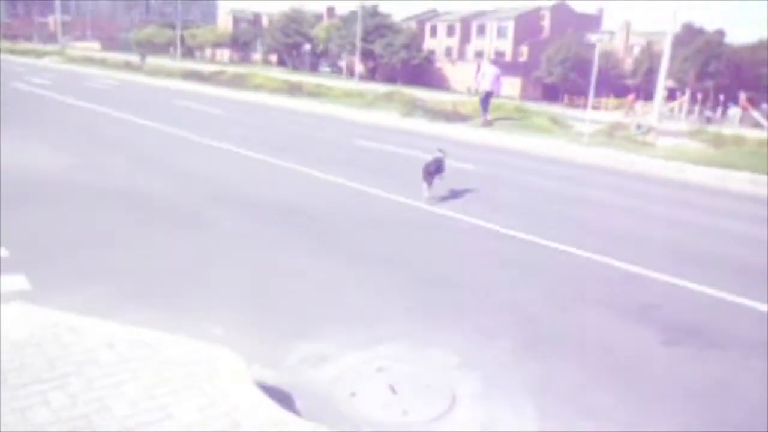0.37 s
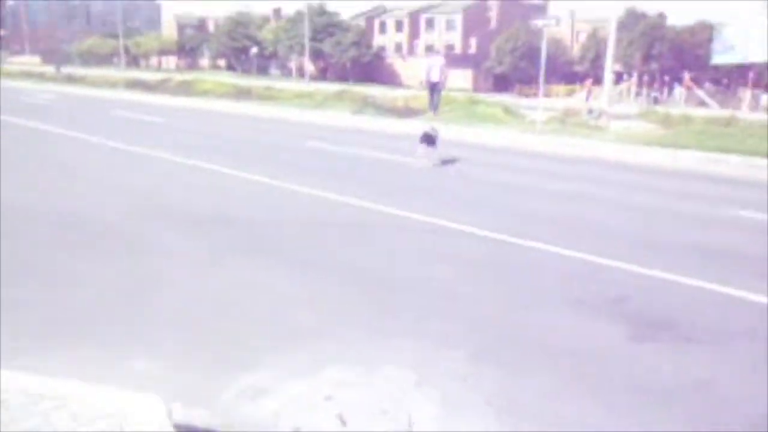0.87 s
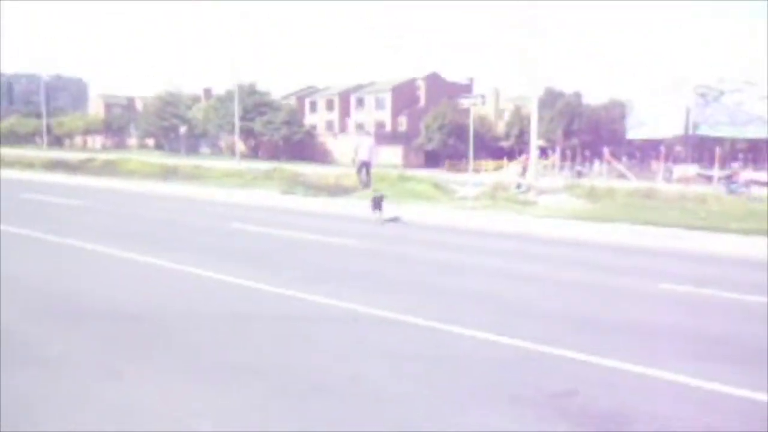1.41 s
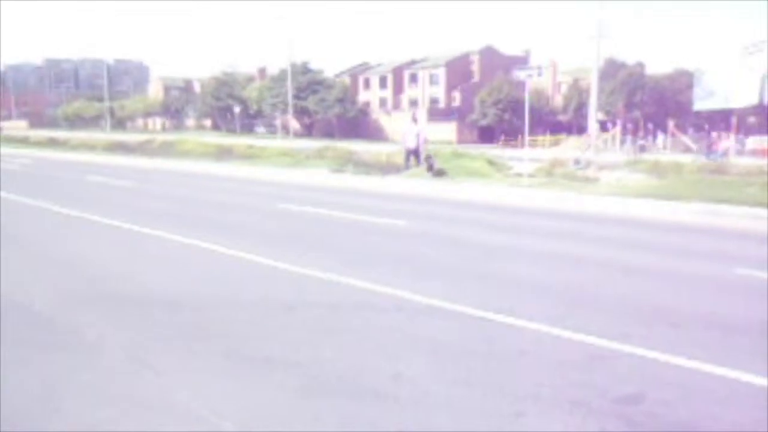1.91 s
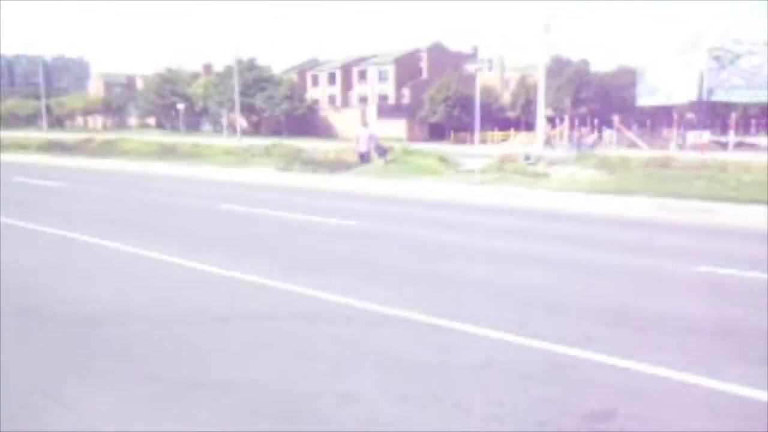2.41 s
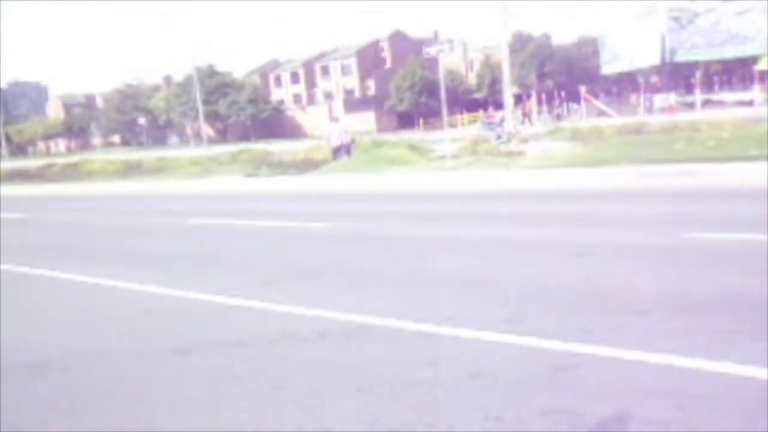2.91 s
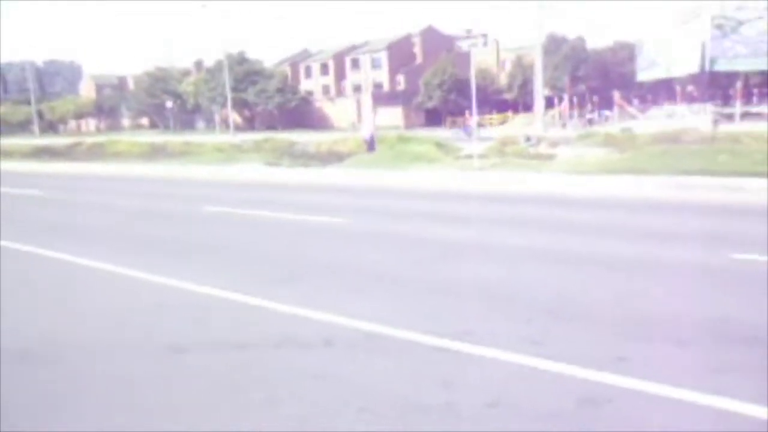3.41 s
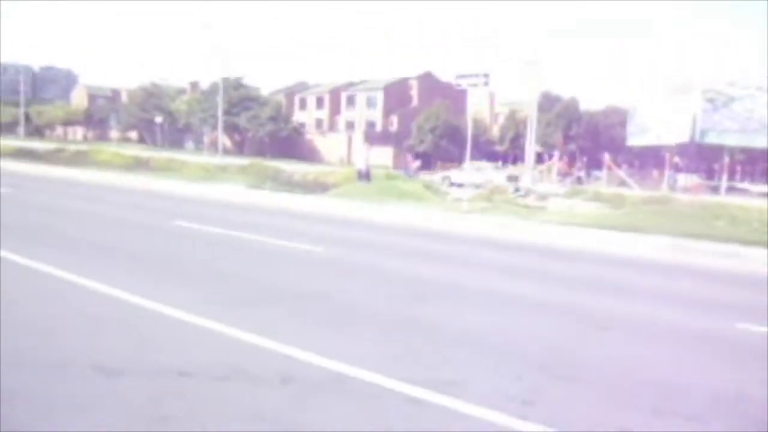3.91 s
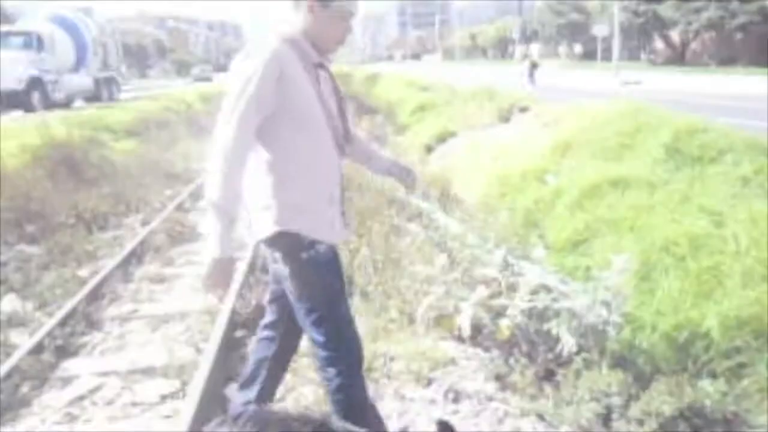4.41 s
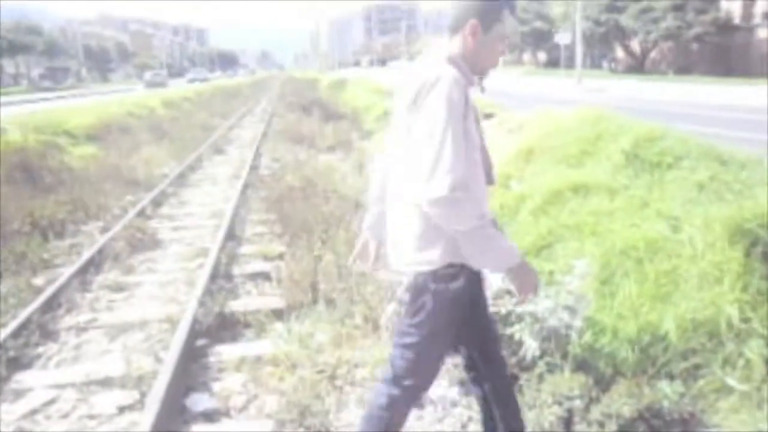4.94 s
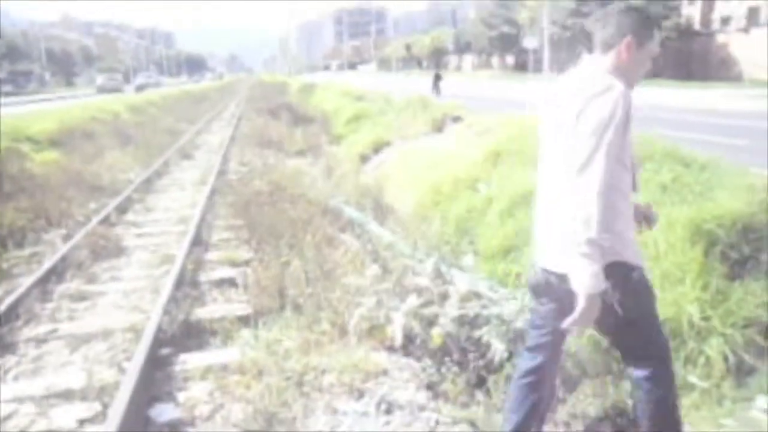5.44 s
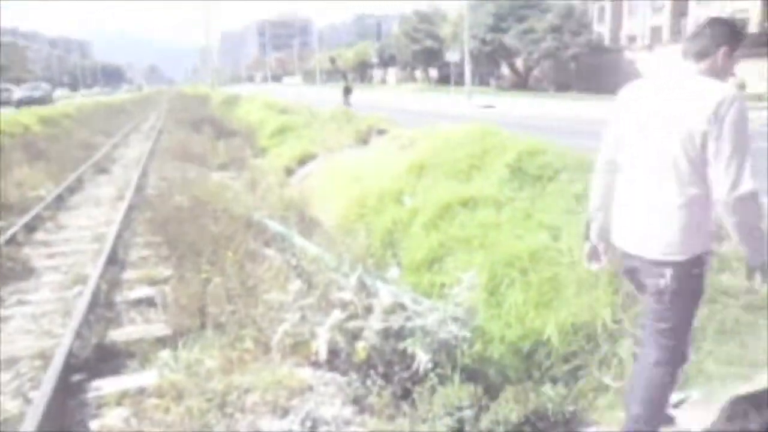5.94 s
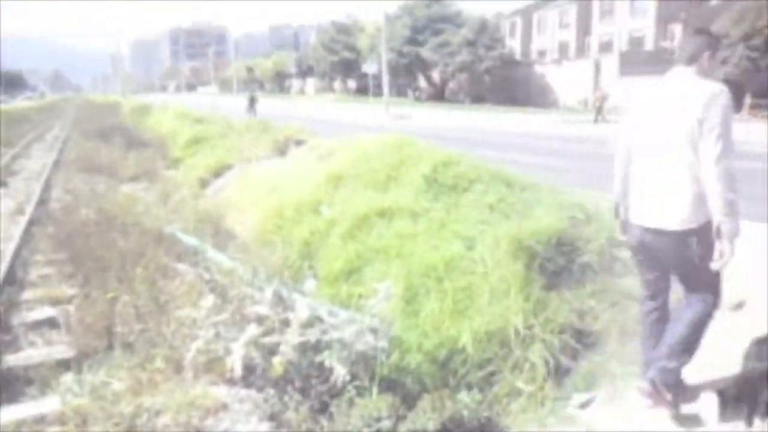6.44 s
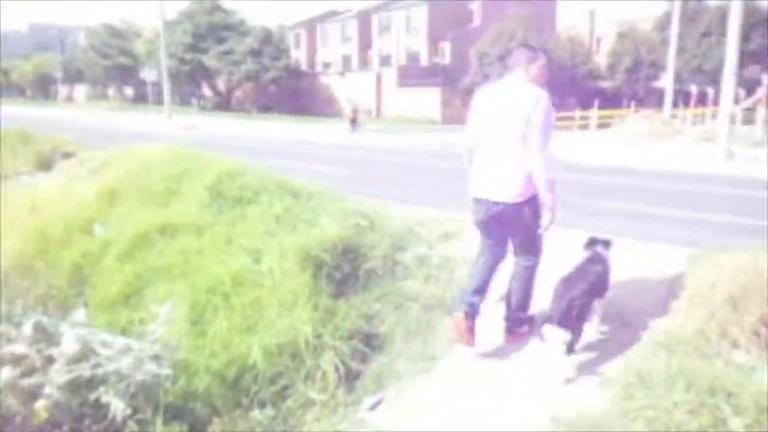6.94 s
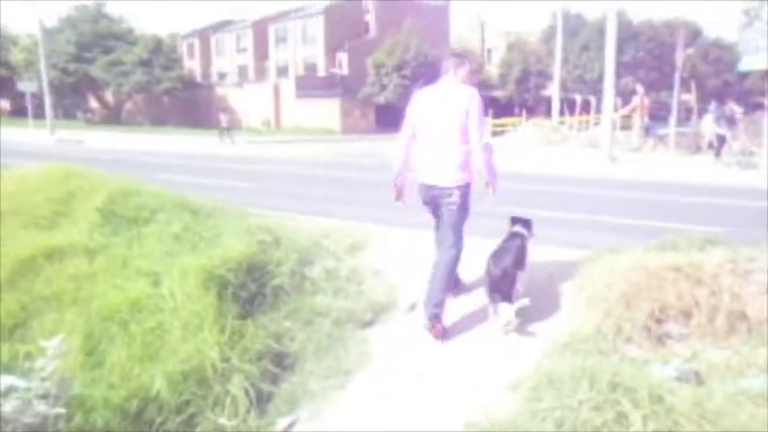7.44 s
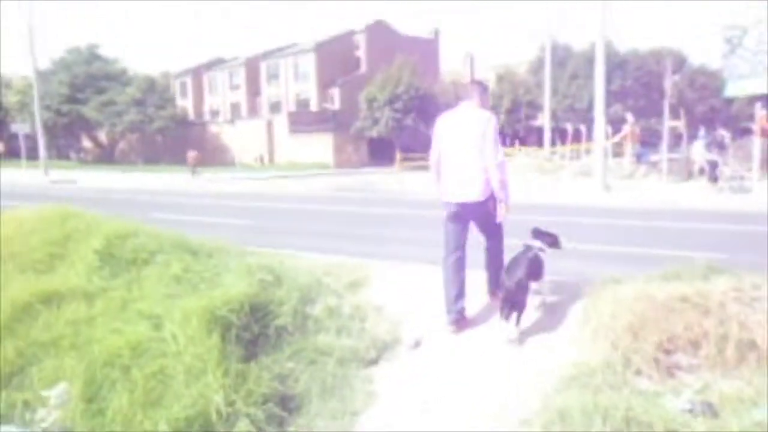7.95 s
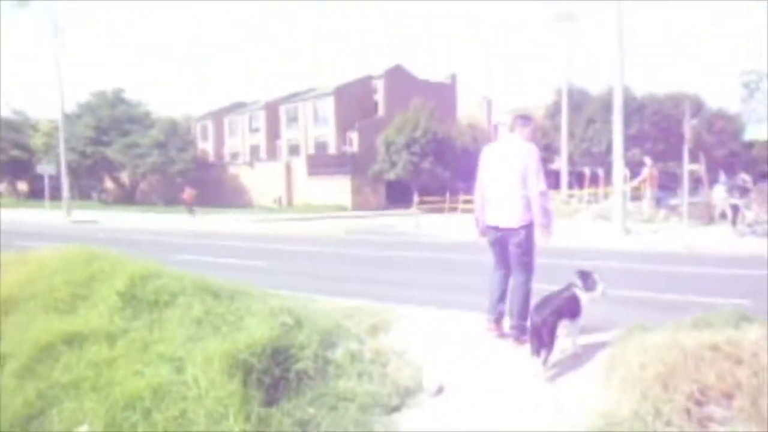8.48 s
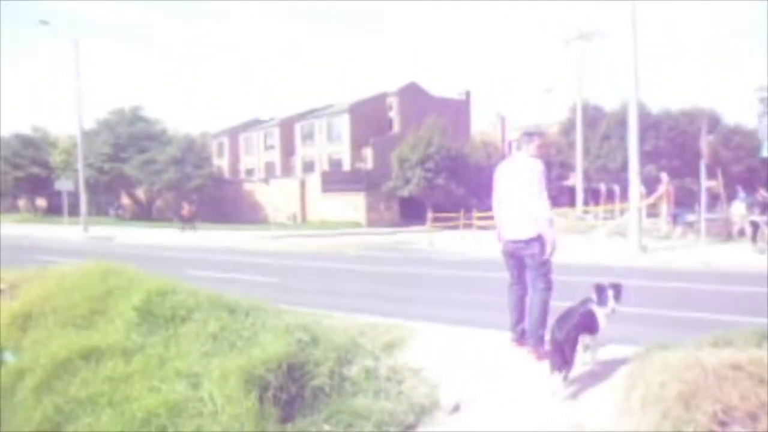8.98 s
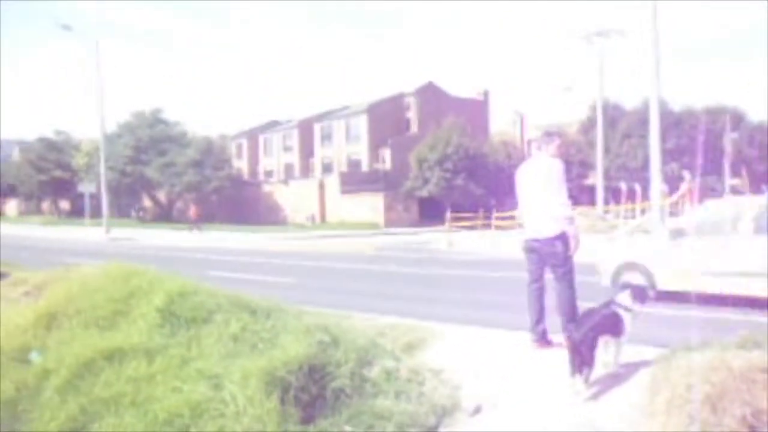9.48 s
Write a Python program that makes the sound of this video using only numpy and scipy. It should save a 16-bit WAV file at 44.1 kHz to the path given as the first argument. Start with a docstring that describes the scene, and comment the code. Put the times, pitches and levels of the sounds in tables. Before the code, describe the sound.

Distant avenue traffic hums under a bird's gliding whistles and soft ticks, then wind buffets the microphone as a lorry roars and bangs past and a car closes in.

```python
"""Beside a wide road, heard by a small camera from two spots with a short silent break between them.
First: far traffic as banded noise, droning engines as wavering harmonics, a bird's two gliding whistles
and trill, finger ticks ringing in the housing. Then, louder: puffs and gusts of wind on the microphone,
a lorry roaring and banging past as noise with hollow resonances and jolts, and a car closing in,
its tyre noise combed by an echo off hard ground."""
import sys
import numpy as np
from scipy import signal
from scipy.fft import rfft, irfft, next_fast_len
from scipy.io import wavfile
from scipy.ndimage import uniform_filter1d, map_coordinates

SR = 44100
rng = np.random.default_rng(int(sys.argv[2]) if len(sys.argv) > 2 else 0)


def level_to_linear(level):
    """Convert decibel levels to linear amplitude factors, elementwise."""
    exponent = np.asarray(level, float) / 20
    return 10 ** exponent


def pcm_store(signal):
    """Save signal as 16-bit PCM."""
    levels = np.round(np.clip(np.atleast_2d(signal), -1, 1) * 32767)
    wavfile.write(sys.argv[1], SR, levels.astype(np.int16).T)


N = 423360

# road ranges drone, roar, tyre, rasp, hiss: (low edge [Hz], high edge [Hz])
ROAD_HZ = [(65, 200), (200, 800), (800, 2400), (2400, 4400), (4400, 9000)]
# position of each road range against the tyre range: (steps)
RANGE_STEPS = np.c_[[-2, -1, 0, 1, 2]]
# a single partial: (multiple, level [dB])
SINGLE = [(1, 0)]


def unit(x):
    """Scaled to rms 1."""
    return x / np.sqrt(np.mean(x ** 2) + 1e-20)


def along(points, hz):
    """(Hz, value) points read on a log frequency axis."""
    f, v = np.transpose(points)
    return np.interp(np.log(hz + 1), np.log(f + 1), v)


def curves(rows):
    """One value per sample for each column after the time."""
    s, *cols = np.transpose(rows)
    return [np.interp(np.arange(N) / SR, s, c) for c in cols]


def wobble(knots_per_s, count=N):
    """Smooth random curve through normal knots."""
    coarse = np.arange(0, count + 100, 100)
    knots = rng.standard_normal(int(count * knots_per_s / SR) + 4)
    smooth = map_coordinates(knots, [coarse * knots_per_s / SR])
    return np.interp(np.arange(count), coarse, smooth)


def filtered(x, response):
    """x shaped by a zero-phase response of frequency."""
    m = next_fast_len(N + 8192)
    return irfft(rfft(x, m) * response(np.fft.rfftfreq(m, 1 / SR)), m)[..., :N]


def add(out, s, sound):
    """Lays a short sound in at s seconds."""
    part = out[round(s * SR):][:len(sound)]
    part += sound[:len(part)]


def patchy(patchy_db):
    """White noise with patches of random gain in time and frequency."""
    z = signal.stft(rng.standard_normal(N), nperseg=512)[2]
    field = uniform_filter1d(rng.standard_normal(z.shape), size=5, axis=0)
    field = uniform_filter1d(field, size=10, axis=1)
    return signal.istft(z * level_to_linear(patchy_db * unit(field)), nperseg=512)[1][:N]


def layers(colour, ranges, patchy_db):
    """Coloured noise split into its overlapping ranges, each of rms 1."""
    def above(hz, at):
        return 1 / (1 + (at / (hz + 1)) ** 8)

    def bank(hz):
        bands = [np.sqrt(above(hz, lo) * (1 - above(hz, hi))) for lo, hi in ranges]
        return colour(hz) * np.array(bands)

    return np.array([unit(v) for v in filtered(patchy(patchy_db), bank)])


def driven(mix_db, level_db, grows=1, pivot_db=0, bright_db=0):
    """Gains of all ranges from one level and brightness; grows is dB per dB about the pivot."""
    return level_to_linear(np.c_[mix_db] + pivot_db + np.c_[grows] * (level_db - pivot_db) + bright_db)


def flutter(db):
    """Random level swing of each road range, in dB."""
    return db * np.array([wobble(rate) for rate in (8.3, 7, 5, 5.6, 5)])


def tone(rows, orders, waver_db, slip_rad, rate):
    """Multiples of a gliding pitch, each wavering in level and phase; silent outside its rows."""
    s, hz, db = np.transpose(rows)
    t = np.arange(max(s[0], 0), s[-1], 1 / SR)
    turn = 2 * np.pi * np.cumsum(np.interp(t, s, hz)) / SR
    stack = np.zeros(len(t))
    for k, level_db in orders:
        gain = level_to_linear(level_db + waver_db * wobble(rate, count=len(t)))
        stack += gain * np.sin(k * turn + slip_rad * wobble(rate, count=len(t)))
    fade = signal.windows.tukey(len(t), .03)
    out = np.zeros(N)
    add(out, t[0], np.sqrt(2) * level_to_linear(np.interp(t, s, db)) * fade * stack)
    return out


def ringing(level, ring):
    """Noise heard through one resonance, on a level curve that rises from silence in 0.1 s."""
    centre_hz, width_hz = ring
    noise = rng.standard_normal(N)
    band = filtered(noise, lambda hz: 1 / (1 + ((hz - centre_hz) / width_hz * 2) ** 2))
    return unit(band) * level_to_linear(curves([(level[0][0] - .1, -120)] + level)[0])


def far_road():
    """Far traffic: steady coloured noise whose ranges flutter apart."""
    # (frequency [Hz], relative density [dB])
    far_colour = [(12, -41.5), (20, 4), (100, 4.5), (200, -10), (320, -10), (380, -16), (430, -14.5),
                  (551, -21.5), (881, -23.5), (1760, -28), (2750, -36), (4620, -37.5), (6380, -33),
                  (6870, -33.5), (7400, -46.5), (9620, -94.5), (16300, -120)]
    # (time [s], level [dB], brightness [dB per range])
    far_level = [(0, -38.5, 0), (.8, -39, -.5), (1.5, -38.5, -0.5), (2.1, -38.5, -.5), (2.6, -39.5, .5),
                 (3.1, -38.5, 1), (3.7, -39, -0.5), (4.46, -38.5, 0)]
    # range against the level: (gain [dB])
    far_mix = [2, 2, 0, -10.5, -20]
    bank = layers(lambda hz: level_to_linear(along(far_colour, hz)), ROAD_HZ, patchy_db=0.8443)
    level_db, bright_db = curves(far_level)
    gains = driven(far_mix, level_db + flutter(db=0.86), bright_db=RANGE_STEPS * bright_db)
    return (bank * gains).sum(0)


def engines():
    """Firing tones of engines near and far, two gathering speed, one slowing, and a tyre tread's whine."""
    # pitch tracks: (time [s], fundamental [Hz], level [dB])
    drone = [(0, 52.8, -35.5), (.5, 51.7, -36.5), (.85, 53.3, -29.5), (1.1, 51.1, -34), (2.1, 51.24, -33),
             (2.4, 51.3, -39.5), (2.9, 52, -32.5), (3.5, 52.22, -32.5), (3.8, 52.5, -37.5),
             (4.455, 52.66, -36.5)]
    hum = [(0, 74.53, -33), (.4, 76.13, -38.5), (.65, 82.78, -26.5), (1, 82.02, -40.5), (1.5, 81.95, -35),
           (2, 81.71, -30), (2.5, 81.8, -25.5), (2.8, 81.6, -36), (4.455, 80.2, -40.5)]
    whine = [(.4, 77.47, -59), (1.2, 80.06, -51.5), (2, 84.43, -46), (2.8, 86.43, -46.5), (3.6, 89.07, -49),
             (4.2, 90, -60)]
    car_engine = [(7.1, 25.64, -35.5), (7.4, 26.04, -23), (7.8, 26.74, -20.5), (8.2, 27.04, -23.5),
                  (8.6, 27.33, -21), (9.1, 26.94, -18), (9.35, 26.43, -23), (9.6, 25.91, -16)]
    throb = [(7.2, 58.61, -30), (7.9, 57.52, -21), (8.3, 57.8, -28.5), (8.7, 56.36, -21), (9.3, 57.55, -26)]
    pull = [(7.6, 36.22, -42.5), (8, 38.98, -37), (8.4, 43.25, -30.5), (8.8, 45.97, -34), (9.2, 46.81, -34),
            (9.6, 45.11, -27.5)]
    coast = [(7.6, 122.2, -33.5), (7.9, 121.7, -35.5), (8.3, 115.9, -28.5), (8.7, 111.2, -37)]
    tread = [(8.6, 761, -50.5), (8.8, 771.5, -33.5), (9, 751, -47), (9.2, 763, -45), (9.4, 763.6, -33.5),
             (9.6, 742, -36.5)]
    # partials: (multiple, level [dB])
    drone_orders = [(2, 1), (3, -4), (4, -11), (6, -11)]
    whine_orders = [(4, -0.5), (5, -0.5)]
    car_orders = [(3, 1), (4, -5), (6, -14)]
    pull_orders = [(2, 0), (3, 1.5), (5, -7), (6, -12.5), (7, -4)]
    running = ((drone, drone_orders), (hum, SINGLE), (whine, whine_orders), (car_engine, car_orders),
               (throb, SINGLE), (pull, pull_orders), (coast, SINGLE), (tread, SINGLE))
    return sum(tone(rows, orders, waver_db=1.5, slip_rad=0.16, rate=3.511) for rows, orders in running)


def trill():
    """Evenly spaced syllables that fade toward the end: (s, level dB)."""
    # (start [s], length [s], level at full voice [dB], level at the end [dB])
    trills = [(2.7025, 0.517, -30.5, -38), (4.5977, .43, -19, -23)]
    syllable_s, full_voice_share = .0662, 0.53
    calls = []
    for s, length_s, db, last_db in trills:
        for t in np.arange(0, length_s, syllable_s):
            calls.append((s + t, np.interp(t / length_s, [full_voice_share, 1], [db, last_db])))
    return calls


def sing(out, calls, shape, husk):
    """Adds one gliding call at each time, its pitch varied a little, its level roughened by husk."""
    at, hz, db = np.transpose(shape)
    t = np.arange(at[0], at[-1], 1 / SR)
    for s, level_db in calls:
        rough = 1 + husk * unit(uniform_filter1d(rng.standard_normal(len(t)), size=50))
        turn = 2 * np.pi * np.cumsum(np.interp(t, at, hz) * rng.normal(1, .008)) / SR
        add(out, s + at[0], level_to_linear(level_db - 3.5 + np.interp(t, at, db)) * rough * np.sin(turn))


def birds():
    """Two long whistles, a trill of sweep and pip, short calls of others, smeared by a short outdoor echo."""
    # whistles: (time [s], pitch [Hz], level [dB])
    rising = [(1.68, 3830, -52.5), (1.71, 3887, -43), (1.8, 4225, -44), (1.9, 4644, -46.5),
              (1.938, 4560, -45), (1.98, 4750, -46), (2.03, 4708, -50), (2.07, 4780, -60.5)]
    falling = [(2.13, 6480, -54.5), (2.155, 6346, -46), (2.18, 5930, -31), (2.235, 5180, -57.5),
               (2.27, 4580, -42), (2.33, 4246, -52), (2.389, 3897, -38.5), (2.47, 3570, -41),
               (2.55, 3250, -49), (2.6, 3080, -58)]
    # call shapes: (time in call [s], pitch [Hz], relative level [dB])
    sweep = [(-.004, 6956, -26.5), (0, 6403, -5.5), (.004, 5781, 0), (.0075, 5446, -7.5),
             (.01, 4900, -23.5), (.014, 4266, -15), (.016, 4110, -31)]
    pip = [(.02, 3287, -13.5), (.025, 3484, -10), (.033, 3600, -5.5), (.037, 3540, -17.5)]
    cheep = [(-.002, 4720, -11.5), (.004, 4340, 2), (.018, 4250, -3.5), (.023, 4500, -6.5),
             (.06, 4450, -19)]
    seep = [(0, 6780, -6.5), (.004, 6800, -4.5), (.016, 6855, 0.5), (.022, 6850, -11.5)]
    churr = [(0, 3497, -9.5), (.005, 3264, -2), (.014, 3050, -2), (.024, 2854, -7)]
    # calls of another bird, thin high ones, low falling ones: (time [s], relative level [dB])
    cheeps = [(5.1443, -18), (5.2669, -17.5)]
    seeps = [(.032, -42.5), (.27, -40), (.606, -44.5)]
    churrs = [(4.543, -18.5), (4.645, -20)]
    out = sum(tone(note, SINGLE, waver_db=1.5, slip_rad=.3, rate=52.5) for note in (rising, falling))
    sing(out, trill(), sweep, husk=.25)
    sing(out, trill(), pip, husk=.3)
    sing(out, cheeps, cheep, husk=.9)
    sing(out, seeps, seep, husk=.5)
    sing(out, churrs, churr, husk=.9)
    t = np.arange(SR // 5) / SR
    echo = rng.standard_normal(len(t)) * level_to_linear(-60 * t / .18)
    return out + level_to_linear(-11) * signal.fftconvolve(out, echo / np.linalg.norm(echo))[:N]


def toots():
    """Short hollow toots and a low bang: five harmonics that swell and stop while the pitch climbs."""
    # (start [s], length [s], starting pitch [Hz], level [dB], step per overtone [dB])
    toot_rows = [(3.687, 0.0416, 319.6, -21.5, -10.5), (3.713, 0.0378, 396, -19, -20.5),
                 (5.005, 0.0651, 590.6, -9.5, -8.5), (6.84, 0.0588, 105.9, 0, -16.5)]
    pitch_rise = .055
    out = np.zeros(N)
    for s, length_s, hz, db, step_db in toot_rows:
        u = np.linspace(0, 1, round(length_s * SR))
        turn = 2 * np.pi * np.cumsum(hz * (1 + pitch_rise * u)) / SR
        stack = sum(level_to_linear(step_db * k) * np.sin((k + 1) * turn) for k in range(5))
        swell = np.sin(np.pi * u ** 1.6) ** 1.3
        add(out, s, level_to_linear(db) * swell * stack)
    return out


def ticks():
    """A snap that rings briefly at its brightest pitch and in the housing below it."""
    # (time [s], relative level [dB], brightest pitch [Hz], 60 dB decay [s], knock against the ring [dB])
    tick_rows = [(1.066, -34.5, 6130, 0.011, -8.5), (1.102, -34.5, 6538, 0.0092, -5.5),
                 (1.1288, -28, 6270, .007, -4.5), (1.1952, -21, 5270, 0.0067, -1),
                 (1.5731, -19, 6340, 0.0053, -12), (1.5984, -33.5, 4520, .009, -5.5),
                 (1.677, -23, 4740, 0.0071, -11), (1.7114, -34.5, 5470, 0.011, -7),
                 (2.9672, -32, 4594, 0.027, -6.5), (3.48, -32.5, 6475, .012, -6),
                 (3.5494, -42, 5970, .009, -6.5), (3.7371, -22, 5780, 0.0092, -3),
                 (4.0218, -35.5, 4885, .009, -5.5), (4.3066, -30, 6690, 0.0092, -1),
                 (4.4384, -33.5, 6170, .009, 1), (4.4458, -30, 6100, 0.0081, 0),
                 (4.4527, -26.5, 5750, 0.0087, -7.5), (5.923, -23, 4620, 0.014, 1.5),
                 (6.6441, -15, 3400, .009, -2), (6.884, -13, 3562, .009, 7.5),
                 (6.9202, -6.5, 5790, 0.014, -14.5), (6.9483, -14, 6000, 0.019, -6),
                 (7.0009, -18.5, 5890, 0.019, -8.5), (7.5253, -27.5, 5180, .015, -1),
                 (9.2982, -8.5, 6203, 0.015, -5.5)]
    knock_hz = 2486
    out, t = np.zeros(N), np.arange(SR // 12) / SR
    attack = 1 - np.exp(-t / .0002)
    for s, db, hz, t60_s, knock_db in tick_rows:
        noise = rng.standard_normal((3, len(t)))
        bright, low = (1 + .5 * unit(uniform_filter1d(v, size=16)) for v in noise[:2])
        ring = bright * np.sin(2 * np.pi * hz * t)
        knock = level_to_linear(knock_db) * low * np.sin(2 * np.pi * knock_hz * t)
        decay = level_to_linear(db + 1.5 - 60 * t / max(t60_s, .003))
        add(out, s + .0007, decay * attack * (ring + knock + 1.1 * noise[2]))
    return filtered(out, lambda hz: 1 / (1 + (hz / 7100) ** 16))


def puffs():
    """Wind puffs striking the microphone: one quick push of air, then a slower swing back."""
    # (time of peak [s], peak level [dB], swing rate at the peak [Hz])
    puff_rows = [(4.536, -5, 54.4), (4.662, -5, 141.4), (4.713, -8, 70), (5.351, -2, 90.2),
                 (5.428, -5.5, 60), (5.465, -1.5, 71.5), (5.491, -4, 89.3), (6.516, -1.5, 130),
                 (7.078, -3.5, 121), (7.121, 2, 195), (7.163, -4, 70), (7.203, -3.5, 110), (7.267, -3, 171),
                 (7.305, -6.5, 111.5), (9.142, -3, 75), (9.192, -2, 65), (9.209, -4, 130)]
    out = np.zeros(N)
    for s, db, hz in puff_rows:
        u = np.arange(-1 / hz, 2.5 / hz, 1 / SR) * hz  # time in cycles
        swing = np.cos(2 * np.pi * (u - 0.13 * u * np.abs(u)))
        envelope = np.exp(-(u / np.where(u < 0, .35, .8)) ** 2)
        add(out, s - 1 / hz, level_to_linear(db) * envelope * swing)
    return out


def wind():
    """Gusts buffet the microphone; stronger ones reach higher."""
    # (frequency [Hz], relative density [dB])
    wind_colour = [(4, -20), (12, -10), (21, 2), (60, -3.5), (130, -6), (200, -14), (400, -17.5),
                   (1000, -30.5), (16300, -90)]
    # buffet, rumble, flap: (low edge [Hz], high edge [Hz])
    wind_hz = [(0, 65), (65, 200), (200, 800)]
    # (time [s], strength [dB])
    gusts = [(0, -38), (1.05, -32.5), (1.9, -39.5), (2.6, -36.5), (3.1, -32.5), (3.7, -35.5), (4.46, -35.5),
             (4.5, -18.5), (4.75, -15.5), (4.95, -24), (5.25, -22), (5.4, -9), (5.55, -14.5), (5.75, -15),
             (6, -23.5), (6.13, -14.5), (6.4, -20.5), (6.6, -17), (7, -18.5), (7.12, -13), (7.3, -21.5),
             (8, -24), (8.3, -29), (8.9, -21.5), (9.05, -17), (9.2, -12), (9.35, -19.5), (9.6, -14.5)]
    # range against the strength at the pivot: (gain [dB])
    wind_mix = [0, -4.5, -19.5]
    # growth of each range with the gust: (slope [dB per dB])
    wind_grows = [0.987, 1.35, 1.5]
    bank = layers(lambda hz: level_to_linear(along(wind_colour, hz)), wind_hz, patchy_db=1.5)
    strength_db = curves(gusts)[0] + 1.2 * wobble(14)
    return (bank * driven(wind_mix, strength_db, wind_grows, pivot_db=-15)).sum(0)


def lorry():
    """Passing lorry: noise with hollow body resonances, duller once its engine has gone by."""
    # (frequency [Hz], relative density [dB])
    lorry_colour = [(12, -29.5), (20, 0.5), (61, 0.5), (275, -13), (389, -6.5), (537, -16.5), (608, -13),
                    (973, -21), (1250, -21.5), (1950, -31.5), (2430, -27.5), (3790, -36.5), (4400, -36),
                    (6540, -35), (7400, -43), (9620, -84), (16300, -120)]
    # hollow resonances: (centre [Hz], width [Hz], lift [dB])
    lorry_body = [(377, 98, 3), (615, 40, -1), (1170, 310, 2.5), (2560, 350, -2)]
    # (time [s], level [dB], brightness [dB per range])
    lorry_level = [(4.5, -26.5, 1.5), (4.8, -26, 0.5), (5.1, -22.5, -.5), (5.3, -22.5, -2.5),
                   (5.48, -22, -5.5), (5.75, -25, -4.5), (6, -30, -3.5), (6.45, -32, -1.5), (7, -42, -1)]
    # range against the level: (gain [dB])
    lorry_mix = [0, 2, -1, -6, -13.5]

    def colour(hz):
        hollow_db = sum(db / (1 + ((hz - c) / w * 2) ** 2) for c, w, db in lorry_body)
        return level_to_linear(along(lorry_colour, hz) + hollow_db)

    bank = layers(colour, ROAD_HZ, patchy_db=1.37)
    level_db, bright_db = curves(lorry_level + [(7.4, -90, 0)])
    return bank * driven(lorry_mix, level_db + flutter(db=1.76), bright_db=RANGE_STEPS * bright_db)


def jolts():
    """Gains of the rattle as each jolt of the load swells and dies, summed in power."""
    # (time [s], level [dB], 10 dB rise [s], 10 dB fall [s], brightness [dB per range])
    jolt_rows = [(5.05, -26.5, .02, 0.16, 0.5), (5.28, -29, .02, 0.02, 1.5), (5.42, -29, .02, 0.013, 2.5),
                 (5.48, -25, .04, .06, -3), (5.67, -28, 0.033, 0.01, 3), (5.92, -31.5, 0.013, 0.19, 2.5),
                 (6.13, -32.5, .02, 0.11, -1.5), (6.59, -15.5, .035, .035, 0),
                 (6.88, -16.5, .055, .06, -.5), (7.45, -39, .02, .03, 4), (7.53, -38.5, 0.031, 0.13, 3)]
    # range against the level: (gain [dB])
    jolt_mix = [7.5, 4, 0, -10.5, -13.5]
    s, db, rise_s, fall_s, bright_db = (np.c_[v] for v in np.transpose(jolt_rows))
    t = np.arange(N) / SR - s
    swell_power = level_to_linear(-20 * np.where(t < 0, -t / rise_s, t / fall_s).clip(0, 9))
    peak = driven(jolt_mix, db.T, bright_db=RANGE_STEPS * bright_db.T)
    return np.sqrt(peak ** 2 @ swell_power)


def trailer():
    """Rattling trailer: fast-wavering noise on a pass-by level joined by the jolts."""
    # (frequency [Hz], relative density [dB])
    rattle_colour = [(12, -29), (20, 3), (48, -5.5), (113, -5), (232, -17), (399, -12), (741, -17.5),
                     (1280, -23.5), (1760, -27.5), (4860, -39.5), (5920, -34), (6700, -36), (7400, -51.5),
                     (9620, -80), (16300, -120)]
    # (time [s], level [dB])
    rattle_level = [(6.42, -53.5), (6.52, -34.5), (6.64, -24), (6.72, -26), (6.79, -28.5), (6.98, -27),
                    (7.15, -30.5), (7.35, -36.5), (7.6, -44), (8, -56.5)]
    # range against the level: (gain [dB])
    rattle_mix = [11, 6, 0.5, -5, -5.5]
    bank = layers(lambda hz: level_to_linear(along(rattle_colour, hz)), ROAD_HZ, patchy_db=2.0)
    bank = bank * level_to_linear(.9 * wobble(60))
    return bank * np.hypot(driven(rattle_mix, curves(rattle_level)[0]), jolts())


def car():
    """Approaching car: coloured noise whose ranges grow at different slopes."""
    # (frequency [Hz], relative density [dB])
    car_colour = [(12, -40), (20, 2.5), (64, -3.5), (90, 1.5), (205, -17), (336, -14), (452, -21),
                  (760, -23.5), (1850, -32.5), (2550, -39), (3440, -39.5), (4740, -46.5), (6070, -43.5),
                  (6870, -48.5), (7400, -59), (9620, -100), (16300, -120)]
    # (time [s], level [dB], brightness [dB per range])
    car_level = [(4.5, -36, 0), (6.5, -38, 0), (7.3, -32.5, 0), (7.7, -31.5, 0), (8.1, -30.5, -1.5),
                 (8.5, -31.5, 0), (8.9, -29.5, .3), (9.25, -26.5, .5), (9.6, -26.5, .3)]
    # range against the level at the pivot: (gain [dB])
    car_mix = [2, 2, .5, -12.5, -18]
    # growth of each range with the approach: (slope [dB per dB])
    car_grows = [1.05, .05, 0.96, 2.33, 2.39]
    bank = layers(lambda hz: level_to_linear(along(car_colour, hz)), ROAD_HZ, patchy_db=0.66)
    level_db, bright_db = curves(car_level)
    return bank * driven(car_mix, level_db, car_grows, pivot_db=-32, bright_db=RANGE_STEPS * bright_db)


def ground_echo(direct):
    """Hard ground adds a short-delayed copy that combs the sound; power is held."""
    # (time [s], echo lag [ms], echo strength [ratio])
    ground = [(4.5, 0.51, 0.016), (7.6, 0.59, 0.072), (8.4, 0.59, 0.085), (9.1, .5, 0.23),
              (9.6, 0.41, 0.15)]
    lag_ms, strength = curves(ground)
    late = np.arange(N) - lag_ms * SR / 1000
    echo = np.interp(late, np.arange(N), direct)
    return (direct + strength * echo) / np.sqrt(1 + strength ** 2)


def near_road():
    """Lorry, trailer and car; the ground echo combs their ranges from the tyre range up."""
    near = lorry() + trailer() + car()
    return near[:2].sum(0) + ground_echo(near[2:].sum(0))


def traffic():
    """Far road at the first spot, near road at the second, plus exhaust boom and close tyres."""
    # the lorry's exhaust boom, the car's tyres close by: (time [s], level [dB])
    boom = [(5, -29), (5.4, -19.5), (5.8, -28), (6, -22), (6.25, -26.5), (6.5, -41), (7.2, -31.5),
            (7.6, -31), (7.9, -46.5)]
    tyres = [(9.05, -56.5), (9.25, -38.5), (9.35, -30), (9.6, -27)]
    # their resonances: (centre [Hz], width [Hz])
    boom_ring = (352.3, 45)
    tyre_ring = (910, 170)
    first_spot = np.arange(N) < 4.47 * SR
    beds = np.where(first_spot, far_road(), near_road())
    return beds + ringing(boom, boom_ring) + ringing(tyres, tyre_ring)


def scene():
    """Everything at the microphone."""
    return (engines() + birds() + toots() + ticks() + puffs() + wind() + traffic())[None]


def top_cut(x):
    """Nothing passes above the cut-off."""
    return signal.sosfilt(signal.butter(12, 15850, fs=SR, output="sos"), x)


def record(dry):
    """A narrow-band camera, silent during the break; the loudest peaks are cut flat."""
    # the break: (time [s], gain [dB])
    break_gain = [(4.4585, -1), (4.4592, -62), (4.4925, -65.5), (4.495, -23), (4.506, -1.5)]
    top_hz = 7267
    narrow = filtered(dry, lambda hz: 1 / (1 + (hz / top_hz) ** 60) * (hz < 7900))
    mix = np.clip(narrow * level_to_linear(curves(break_gain)[0]), -.99, .99)
    return top_cut(mix)


dry = scene()
out = record(dry)
pcm_store(out)
```